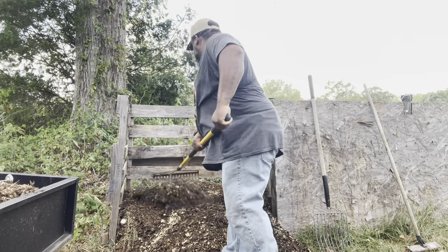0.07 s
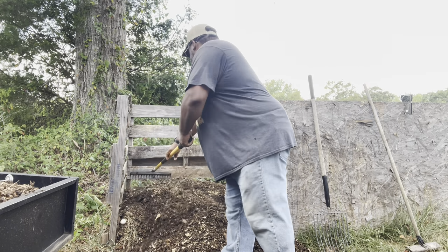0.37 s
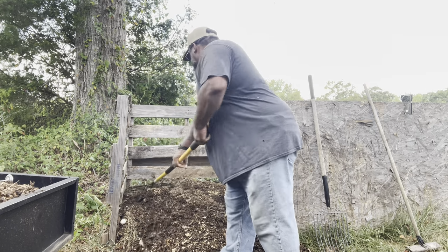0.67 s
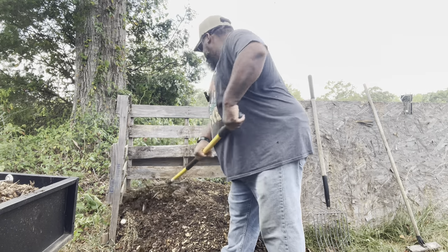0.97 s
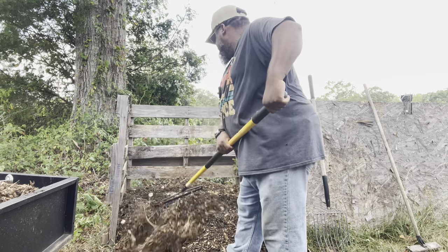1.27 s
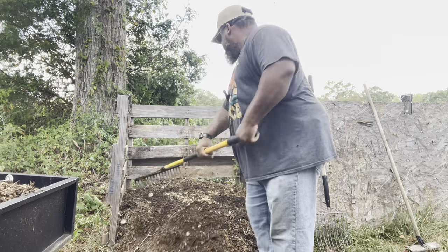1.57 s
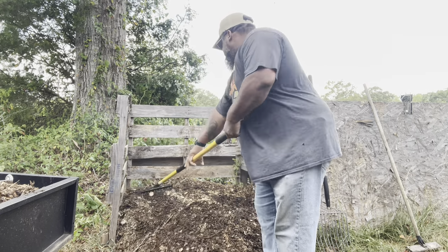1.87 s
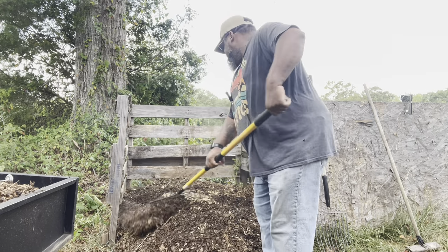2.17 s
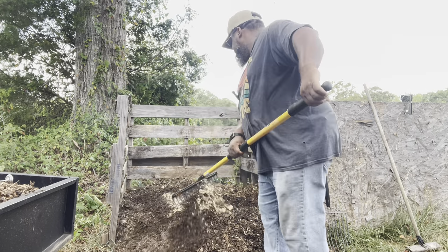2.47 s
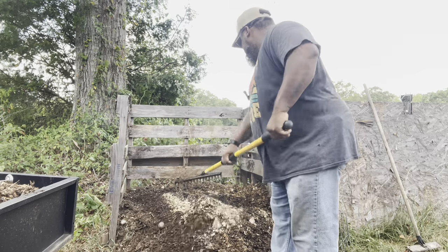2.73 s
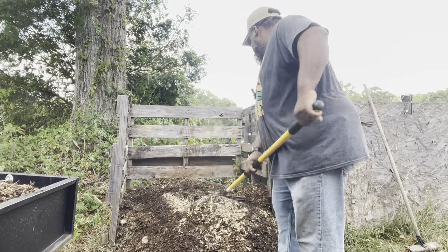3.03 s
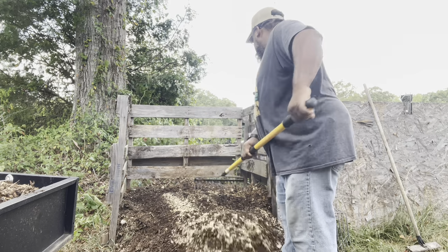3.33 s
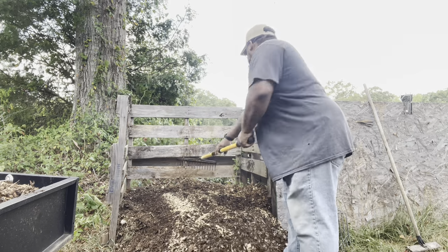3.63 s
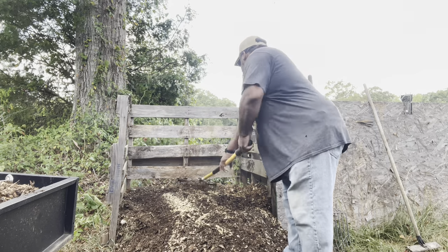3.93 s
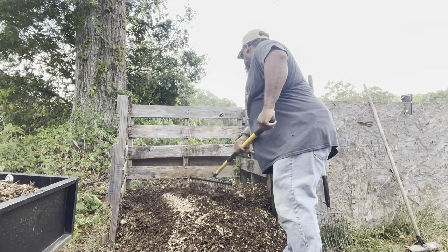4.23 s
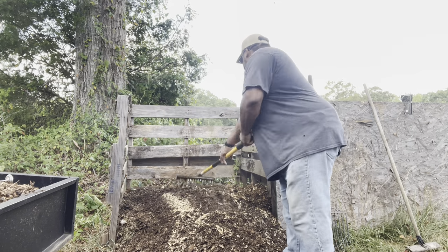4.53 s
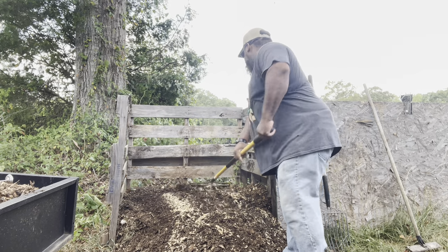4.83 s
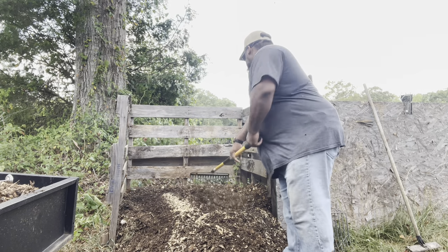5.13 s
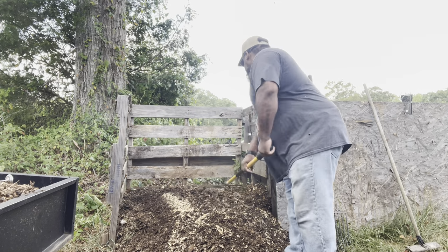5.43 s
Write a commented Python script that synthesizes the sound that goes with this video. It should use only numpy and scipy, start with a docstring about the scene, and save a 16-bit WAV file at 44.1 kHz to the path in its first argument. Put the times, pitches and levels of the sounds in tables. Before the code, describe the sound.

A steel garden rake works through wood chips outdoors, close to the microphone. Soft, crackling strokes swell and settle throughout, over an uneven low rumble and a faint distant road. At about 0.4 seconds the rake head lands with a clack and brief ring. The tines rasp until 1.1 seconds, with a twig snap at 0.8 and tiny squeaks around 1. Clods tumble softly near 1.5 and 2.3 seconds. Two sharp twig snaps come at 2.8 and 3 seconds. At 3.8 seconds the rake strikes the slatted wooden bin with a very loud, hollow knock that briefly overloads the microphone and leaves a low boom. A duller thud with a crunch and snap follows at 4.5 seconds, then light scraping. At 5.2 seconds a loud crack with a short metallic ring cuts through as the chips keep rustling.

```python
"""Raking a compost bin

Outdoors, a microphone pair close to a bin of wooden slats. A steel garden rake drags through wood
chips: they rustle and tumble, the tines scrape, squeak and snap twigs, and the rake head knocks on
the bin, once hard enough to overload the microphones. Behind lie a low rumble and a distant road."""
import sys
import numpy as np
from scipy import signal
from scipy.fft import rfft, irfft
from scipy.io import wavfile

SR = 44100
rng = np.random.default_rng(int(sys.argv[2]) if len(sys.argv) > 2 else 0)


def bounce(signal):
    """Save signal as a 16-bit WAV file at the path given by the first command-line argument."""
    frames = np.transpose(np.atleast_2d(signal))
    limited = np.clip(frames, -1, 1)
    pcm = np.round(limited * 32767).astype(np.int16)
    wavfile.write(sys.argv[1], SR, pcm)


N = 242550
TIME, HZ = np.arange(N) / SR, np.fft.rfftfreq(N, 1 / SR)
LEFT_LAG_S = 0.00019  # rustle and twig cracks reach the left microphone this much later

# Spectrum of crackling wood chips. Each row: frequency in Hz, relative level in dB.
CHIP_SPECTRUM = [(200, -0.5), (600, -7), (1500, 2), (3000, 3), (4500, -2.5), (7000, 0.5), (10000, 2.5),
                 (13000, -4), (16000, -2)]
# Knocks: the rake head lands on bin or pile, and once a clod drops.
# Each row: start in seconds, bin ring in dB, rake ring in dB, favoured rake pitch in Hz, crunch in dB,
# thud in dB, nominal thud pitch in Hz, clack in dB, nominal clack pitch in Hz, contact time in seconds,
# lead at the left microphone in seconds.
IMPACTS = [(0.4432, -24.5, -22, 1040, -56, -19.5, 201, -20.5, 870, 0.006, 0.00015),
           (3.418, -61, -63, 880, -60, -44, 201, -39, 900, 0.0022, 0.000078),
           (3.7647, -2.5, -20, 2200, -24, -22, 192.6, -9, 1235, 0.0024, 0.000061),
           (3.7852, -23, -42, 1900, -31, -29, 149, -13.5, 665, .001, 0.00012),
           (4.5437, -41, -46, 2200, -24.5, -30.5, 121.5, -50, 1950, 0.0034, 0.00011),
           (4.559, -39, -48, 1900, -42, -19.5, 114, -31, 720, 0.004, 0.000042),
           (5.2205, -35, -52, 700, -21.5, -53, 140, -32.5, 710, 0.0012, 0.000042),
           (5.2278, -39, -27, 2600, -26.5, -30, 137, -26.5, 2080, 0.00044, 0.000046)]


def amp(db):
    return 10 ** (np.asarray(db) / 20)


def unit(x):
    """Scales to rms 1."""
    return x / np.sqrt(np.mean(x ** 2) + 1e-20)


def add(mix, start, sound):
    """Mixes a stereo sound in at a start in seconds."""
    part = mix[:, round(start * SR):][:, :sound.shape[1]]
    part += sound[:, :part.shape[1]]


def colour(x, spectrum):
    """Minimum-phase filter that follows rows of frequency in Hz and gain in dB."""
    hz, db = np.transpose(spectrum)
    log_hz = np.log(abs(np.fft.fftfreq(N, 1 / SR)) + 1)
    log_gain = np.log(amp(np.interp(log_hz, np.log(hz), db)))
    response = np.exp(np.conj(signal.hilbert(log_gain)))[:len(HZ)]
    return irfft(rfft(x, N) * response, N)[..., :x.shape[-1]]


def pitched(shape, hz):
    """Places a spectrum given in multiples on a pitch."""
    return [(multiple * hz, db) for multiple, db in shape]


def mic_pair(noises, shared, left_lag_s):
    """Of three noises, both microphones hear the first, the direct sound, and each one other as scatter."""
    direct, scatter = noises[0], noises[1:]
    left = irfft(rfft(direct, N) * np.exp(-2j * np.pi * HZ * left_lag_s), N)[:len(direct)]
    return np.sqrt(shared) * np.array([left, direct]) + np.sqrt(1 - shared) * scatter


def grains(per_s, spread_db):
    """Tiny fractures of random time and size, as three noises for the microphone pair."""
    size = amp(spread_db * np.minimum(rng.exponential(1, N), 4))
    breaks = rng.random(N) < per_s / SR
    return unit(size * breaks * rng.standard_normal((3, N)))


def flutter(depth_db, hz):
    """A random gain that wanders up to about hz times a second."""
    wander = irfft(rfft(rng.standard_normal(N)) / (1 + (HZ / hz) ** 4), N)
    return amp(depth_db * unit(wander))


def swells(rows):
    """A gain made of bell-shaped bursts that add in power."""
    return np.sqrt(sum(amp(2 * db) * np.exp(-((TIME - middle) / half) ** 2) for middle, half, db in rows))


def ring(modes, t, favoured_hz=1000, narrow_db=0):
    """Damped modes, neighbours swinging opposite ways; narrow_db weakens those off the favoured pitch."""
    hz, db, t60 = np.transpose(modes)[:, :, None]
    db = db - narrow_db * np.log2(hz / favoured_hz) ** 2
    sign = (-1) ** np.arange(len(hz))[:, None]
    return (sign * amp(db) * np.exp(-np.log(1000) * t / t60) * np.sin(2 * np.pi * hz * t)).sum(0)


def rumble():
    """A low rumble, stronger on the right, that rises and falls and swells with the bin's boom."""
    # Each row: frequency in Hz, relative level in dB.
    spectrum = [(15, -16), (30, -21), (45, -10.5), (62, 6.5), (82, 4), (115, -4), (160, -16.5), (300, -64),
                (700, -80)]
    # Each row: time in seconds, relative level in dB.
    level_curve = [(0, -50), (.25, -44), (.75, -46), (1.15, -41), (1.3, -51), (1.47, -44), (1.82, -46),
                   (2.05, -40.5), (2.8, -46), (3.22, -38), (3.6, -45.5), (3.87, -43.5), (4.0, -28),
                   (4.17, -42), (4.65, -41), (5.5, -40.5)]
    level = amp(np.interp(TIME, *np.transpose(level_curve)))
    noise = mic_pair(rng.standard_normal((3, N)), shared=0.97, left_lag_s=0)
    return unit(colour(noise, spectrum)) * np.hypot(level, bin_boom()) * amp([[-2.5], [3]])


def road():
    """The diffuse roar of a distant road slowly grows."""
    # Each row: frequency in Hz, relative level in dB.
    spectrum = [(60, 1.5), (200, 0), (280, -5.5), (370, -11), (500, -4), (620, 3.5), (760, 4), (1100, -0.5),
                (1500, -8), (2200, -12.5), (3500, -19.5), (6000, -29.5), (10000, -35), (16000, -26)]
    start_db, rise_db_per_s = -49, 1.0
    noise = mic_pair(rng.standard_normal((3, N)), shared=0.04, left_lag_s=-0.00017)
    level = amp(start_db + rise_db_per_s * TIME) * flutter(depth_db=0.82, hz=7.8)
    return unit(colour(noise, spectrum)) * level


def chip_rustle():
    """Each stroke crackles up as the tines sink in, holds, and dies away as the chips settle."""
    # Each row: start, swell and hold in seconds, relative level in dB, settling time in seconds.
    strokes = [(0, 0.0018, .2, -55, 1), (0.413, 0.073, 0.029, -51.5, 0.2),
               (0.556, 0.096, 0.087, -48.5, 0.21), (.86, 0.15, 0.14, -46.5, 0.22),
               (1.021, .31, 0.21, -45, 0.16), (1.766, .05, 0.006, -52.5, 0.8),
               (2.079, .18, 0.02, -45.5, 0.13), (2.35, 0.13, .01, -50.5, 0.29),
               (2.823, 0.052, 0.13, -56.5, 0.22), (3.192, 0.16, 0.049, -49.5, 0.43),
               (3.725, 0.047, 0.036, -48, 0.35), (4.278, 0.059, 0.021, -53, 0.16),
               (4.59, 0.061, 0.023, -44.5, 0.081), (4.827, 0.05, 0.055, -53.5, 0.22),
               (5.045, 0.12, 0.14, -52, 0.18), (5.27, 0.049, 0.043, -50, 0.11)]
    power = np.zeros(N)
    for start, swell_s, hold_s, db, settle_s in strokes:
        bite = np.clip((TIME - start) / swell_s, 0, 1)
        release = np.exp(-np.maximum(TIME - start - swell_s - hold_s, 0) / settle_s)
        power += (amp(db) * bite * release) ** 2
    fractures = mic_pair(grains(per_s=9000, spread_db=-0.3), shared=0.8, left_lag_s=LEFT_LAG_S)
    level = np.sqrt(power) * flutter(depth_db=1.0, hz=34.3) * amp(2.5)
    return unit(colour(fractures, CHIP_SPECTRUM)) * level


def knocks():
    """The rake head lands on bin or pile, and once a clod drops: a clack, a ring, a crunch and a thud."""
    # Modes of the slatted bin. Each row: frequency in Hz, level in dB, time to fall 60 dB in seconds.
    bin_modes = [(112.5, -8, 0.42), (146, -17, 0.33), (180, -10, 0.16), (231, -15, 0.17), (406, -22, 0.11),
                 (540, -7, 0.075), (668, 1.5, 0.08), (822, -6, 0.06), (940, 2, 0.016), (1102, 3.5, 0.044),
                 (1160, 1, 0.02), (1360, -14, 0.055), (1700, -21, 0.06), (2940, -20, 0.05)]
    # Modes of the rake's head and handle, with the same columns.
    rake_modes = [(555, -2, 0.16), (689, -2, 0.08), (770, -7, 0.12), (1114, -7, 0.071), (1330, 9.5, 0.05),
                  (1375, -5, 0.049), (1465, 2, 0.045), (1938, 2, 0.047), (2100, -5, 0.018),
                  (2480, -9.5, 0.067), (2880, -10, 0.038), (3030, -8.5, 0.063), (3740, -20, 0.042)]
    # Spectrum of the clack. Each row: multiple of the clack pitch, relative level in dB.
    clack_shape = [(.15, -11.5), (.28, -36), (.42, -25.5), (.7, 5), (.95, -3.5), (1.5, -4), (2.1, -15),
                   (2.9, -11), (4.2, -19.5), (8, -34)]
    out, t = np.zeros((2, N)), np.arange(SR * 3 // 4) / SR
    fractures = mic_pair(grains(per_s=3000, spread_db=0.5), shared=0.19, left_lag_s=-0.000051)
    crackle = unit(colour(fractures, CHIP_SPECTRUM))
    # chips and soil give way slowly
    crush = (1 - np.exp(-t / 0.011)) * np.exp(-t / 0.014)
    settle = (1 - np.exp(-t / 0.009)) ** 2 * np.exp(-t / 0.024)
    # thud and ringing sag in pitch as the pressure eases
    sharp_share, relax_s = 0.032, 0.0054
    ring_time = t + sharp_share * relax_s * (1 - np.exp(-t / relax_s))
    thud_time = np.cumsum(0.86 + 0.4 * np.exp(-t / 0.022)) / SR
    chatter = 0.24 * np.exp(-t / 0.015)
    for (start, bin_db, rake_db, favoured_hz, crunch_db, thud_db, thud_hz,
         clack_db, clack_hz, contact_s, lead_s) in IMPACTS:
        ringing = amp(bin_db) * ring(bin_modes, ring_time)
        ringing += amp(rake_db) * ring(rake_modes, ring_time, favoured_hz, narrow_db=6.5)
        ringing *= 1 - np.exp(-t / (0.48 * contact_s))
        # the left microphone hears the blow first and with less bass
        left = ringing - 0.54 * signal.lfilter(*signal.butter(1, 450, fs=SR), ringing)
        right = np.interp(t - lead_s, t, ringing)
        # contact takes a few milliseconds at most, and chatter follows
        contact = (1 - np.exp(-t / (0.29 * contact_s))) * (np.exp(-t / contact_s) + chatter)
        rattle = mic_pair(rng.standard_normal((3, N)), shared=0.83, left_lag_s=-lead_s)
        clack = amp(clack_db) * contact * unit(colour(rattle, pitched(clack_shape, clack_hz)))[:, :len(t)]
        crumbling = flutter(depth_db=5.5, hz=85)[:len(t)]
        thud = amp(thud_db) * settle * crumbling * np.sin(2 * np.pi * thud_hz * thud_time)
        crunch = amp(crunch_db) * crush * np.roll(crackle, -round(start * SR), 1)[:, :len(t)]
        add(out, start, np.array([left, right]) + clack + thud * amp([[-3], [2]]) + crunch)
    return out + amp(-8.5) * garden_echoes(out, t60=0.1, band_hz=(500, 6140))


def garden_echoes(x, t60, band_hz):
    """Short, dull scatter from the bin, the fence and the trees; the bass passes them by."""
    t = np.arange(SR // 2) / SR
    taps = rng.standard_normal((2, len(t))) * (rng.random((2, len(t))) < 3000 / SR)
    taps *= (t > 0.003) * amp(-60 * t / t60)
    taps = signal.lfilter(*signal.butter(1, band_hz, "bandpass", fs=SR), taps)
    taps /= np.linalg.norm(taps, axis=1, keepdims=True)
    return signal.fftconvolve(x, taps, axes=1)[:, :N]


def bin_boom():
    """The bin's low boom builds and fades after each blow, in proportion to it: a gain for the rumble."""
    relative_db, rise_s = -33, 0.13
    gain = np.zeros(N)
    for start, bin_db, *_ in IMPACTS:
        age = np.maximum(TIME - start, 0) / rise_s
        gain += amp(bin_db + relative_db) * age * np.exp(1 - age)
    return gain


def tine_scrapes():
    """Dragged tines catch on the chips and rasp over them in a run of tiny slips."""
    # Each row: middle and half length in seconds, level in dB, rasp pitch in Hz.
    scrapes = [(0.447, 0.009, -37.5, 1220), (0.665, 0.04, -47.5, 1270), (0.716, 0.0062, -42, 10200),
               (0.731, 0.025, -46, 1240), (0.85, 0.062, -50, 1290), (1.001, 0.015, -48.5, 1270),
               (1.063, 0.025, -42, 1270), (1.114, 0.011, -45, 1260), (3.428, 0.12, -55.5, 2800),
               (4.352, 0.026, -47, 1430), (4.69, 0.036, -49.5, 1350)]
    # Spectrum of the rasp. Each row: multiple of its pitch, relative level in dB.
    rasp_shape = [(.23, -17), (.46, -4), (.8, -4), (1, 5), (1.15, -1), (1.36, 2), (1.6, -9), (2.3, -10),
                  (2.7, -12), (4.6, -20), (9, -47)]
    slips = mic_pair(grains(per_s=2500, spread_db=1.5), shared=0.18, left_lag_s=-0.000074)
    rasp = sum(unit(colour(slips, pitched(rasp_shape, hz))) * swells([(middle, half, db)])
               for middle, half, db, hz in scrapes)
    return rasp * flutter(depth_db=1.5, hz=60)


def twig_snaps():
    """A twig cracks and splinters for a few milliseconds while the flicked tine rings briefly."""
    # Each row: start in seconds, relative levels of crack and ring in dB, favoured ring pitch in Hz.
    snaps = [(.530, -44, -49, 10200), (.839, -30, -28, 6000), (1.688, -41, -40, 6500),
             (2.8097, -20, -27, 4630), (2.935, -41, -49.5, 9000), (3.0249, -23.5, -22, 7400),
             (4.535, -25, -45, 8050), (5.228, -13, -12, 1700)]
    # Tone of the crack. Each row: frequency in Hz, gain in dB.
    crack_spectrum = [(300, -12), (900, -2), (1600, 6), (3000, -8), (6000, 3), (10000, 10.5), (16000, -8)]
    # Modes of a tine. Each row: frequency in Hz, level in dB, time to fall 60 dB in seconds.
    tine_modes = [(1620, -4, 0.018), (2300, -10, 0.016), (3720, -11, 0.009), (4350, -15, 0.0095),
                  (5400, -18, 0.005), (5730, -10, 0.011), (9750, -5.5, 0.0024), (10700, -3, 0.005),
                  (14700, 7, 0.0015)]
    cracks, rings, t = np.zeros((2, N)), np.zeros((2, N)), np.arange(SR // 25) / SR
    decay = 0.33 * np.exp(-t / 0.00078) + 0.055 * np.exp(-t / 0.007)
    for start, crack_db, ring_db, favoured_hz in snaps:
        splinters = rng.standard_normal((3, len(t))) * decay
        splinters[0, 0] += 1.8  # the break itself, in the direct sound
        add(cracks, start, amp(crack_db) * mic_pair(splinters, shared=0.57, left_lag_s=LEFT_LAG_S))
        tine = amp(ring_db) * ring(tine_modes, t, favoured_hz, narrow_db=4.0)
        add(rings, start, np.array([tine, tine]))
    return colour(cracks, crack_spectrum) + rings


def tumbling_clods():
    """Heaps of compost are dragged over and roll down the pile, a little to the right."""
    # Each row: middle and half length in seconds, relative level in dB.
    tumbles = [(.72, 0.036, -52), (1.535, 0.051, -44.5), (2.2, 0.039, -49), (2.35, 0.051, -49.5),
               (3.41, 0.067, -53), (3.91, 0.097, -49), (4.37, 0.023, -47), (5.35, 0.023, -49)]
    # Each row: frequency in Hz, relative level in dB.
    spectrum = [(50, -2.5), (120, -14), (220, 10), (340, -10.5), (550, 7), (900, -5.5), (1400, -5),
                (2200, -10), (3500, -12), (7000, -30)]
    crumbs = mic_pair(grains(per_s=3700, spread_db=0), shared=0.82, left_lag_s=-0.000019)
    level = swells(tumbles) * flutter(depth_db=4.0, hz=38)
    return unit(colour(crumbs, spectrum)) * level * amp([[-1], [1]])


def tine_squeaks():
    """A tine that sticks and slips on a chip gives a short, unsteady squeak."""
    # Each row: middle and half length in seconds, level in dB, pitch in Hz.
    squeaks = [(0.986, 0.0078, -44, 1282), (1.073, 0.0055, -34.5, 1263), (1.103, 0.008, -44.5, 1270),
               (2.881, 0.01, -47.5, 1340)]
    out = np.zeros(N)
    for middle, half, db, hz in squeaks:
        cycles = np.cumsum(hz * flutter(depth_db=0.15, hz=90)) / SR
        out += swells([(middle, half, db)]) * np.sin(2 * np.pi * cycles)
    return out * flutter(depth_db=2.0, hz=120)


def scene():
    """The rake at work close by, over the rumble and the far road."""
    return (rumble() + road() + chip_rustle() + knocks() + tine_scrapes() + twig_snaps()
            + tumbling_clods() + tine_squeaks())


def record(dry):
    """The hardest knock overloads the microphones and clips; the treble ends at 16 kHz."""
    lowpass = signal.firwin(401, 16000, window=("kaiser", 9), fs=SR)
    return signal.oaconvolve(np.clip(dry, -1, 1), lowpass[None], "same")


dry = scene()
out = record(dry)
bounce(out)
```